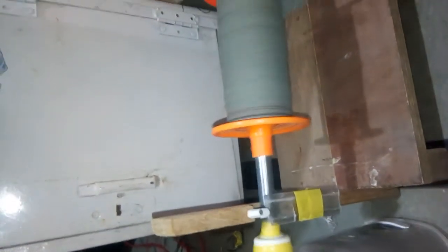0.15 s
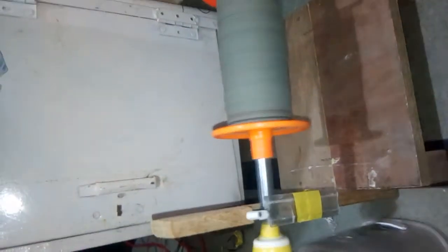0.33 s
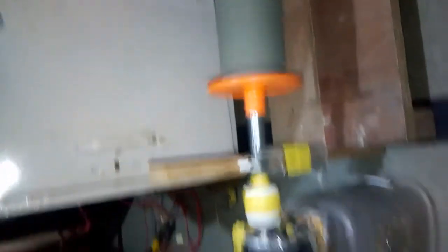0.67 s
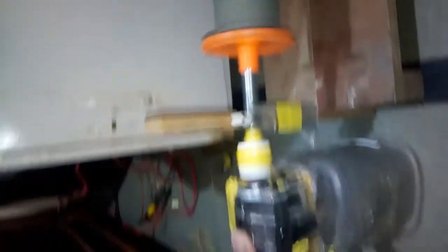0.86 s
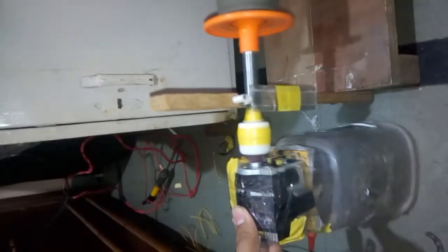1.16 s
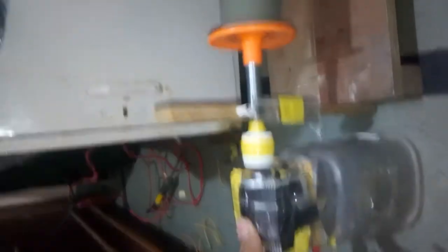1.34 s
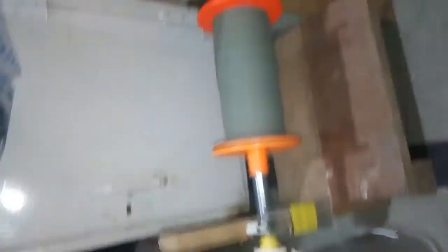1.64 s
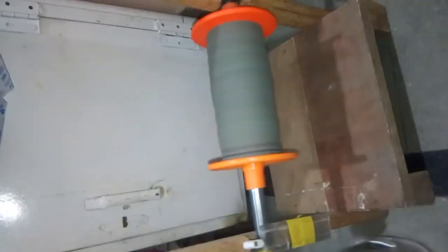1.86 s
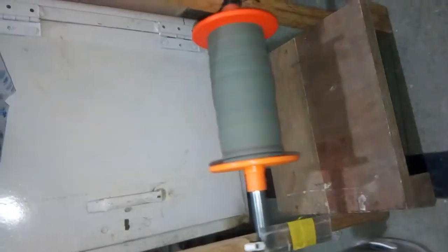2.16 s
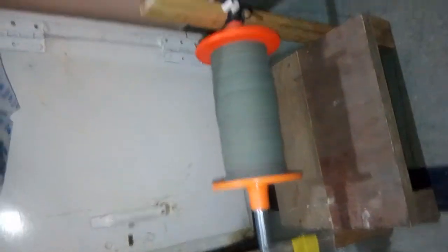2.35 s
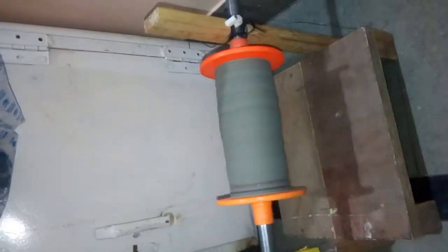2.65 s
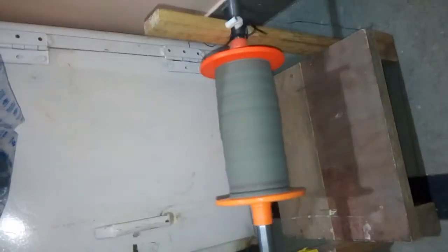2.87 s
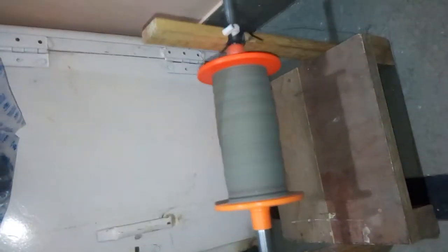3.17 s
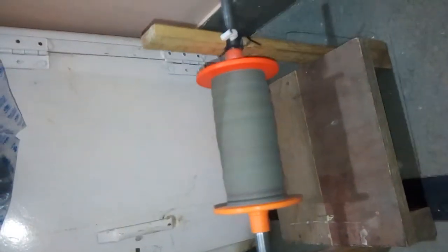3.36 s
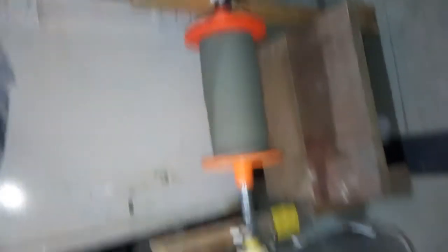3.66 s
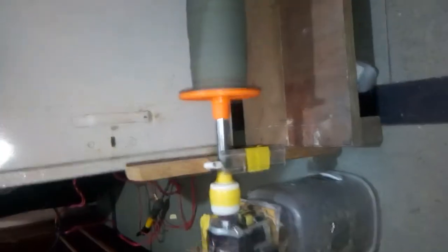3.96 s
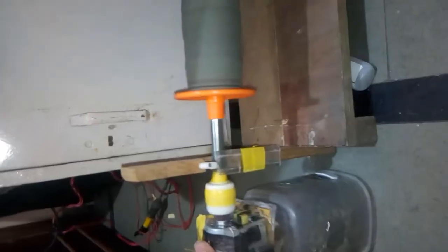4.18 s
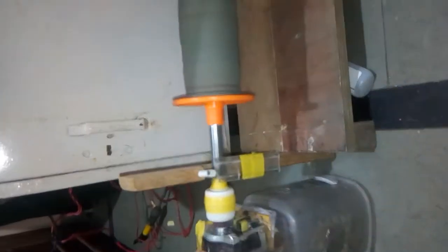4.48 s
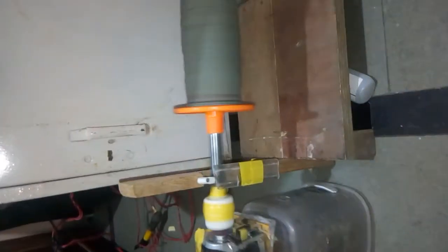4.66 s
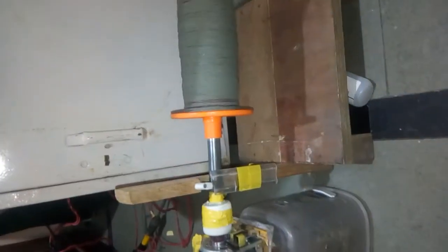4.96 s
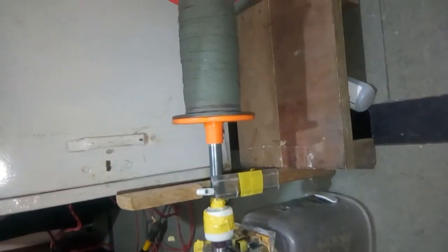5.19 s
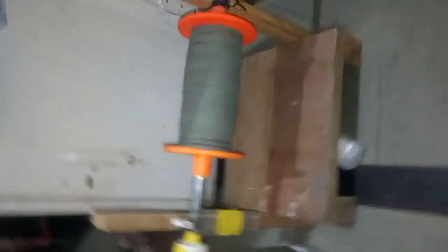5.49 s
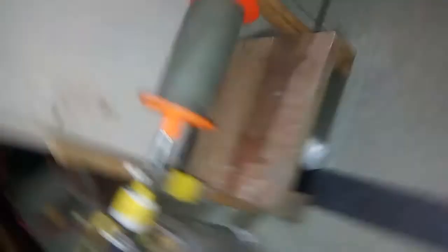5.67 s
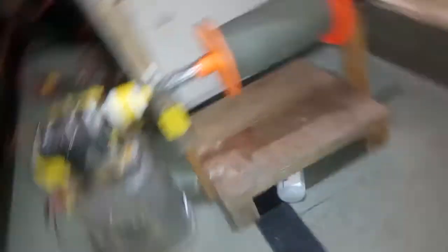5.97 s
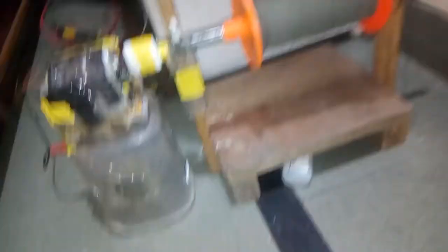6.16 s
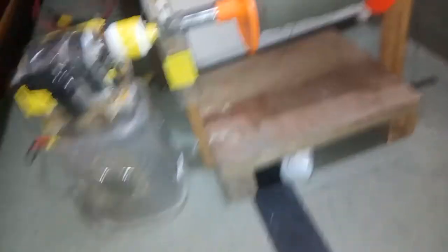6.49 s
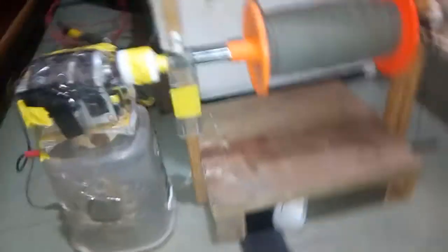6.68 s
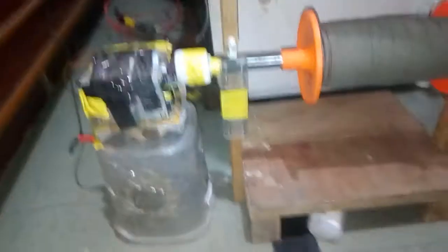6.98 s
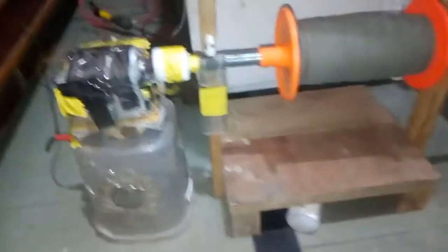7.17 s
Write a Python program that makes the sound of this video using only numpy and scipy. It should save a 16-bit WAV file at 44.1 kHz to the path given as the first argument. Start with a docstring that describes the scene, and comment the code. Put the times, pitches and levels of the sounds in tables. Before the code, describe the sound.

A motor-driven reel speeds up into a loud, buzzing rattle of metal clacks, wooden knocks and rasping friction, heard close up in a small room. The clatter slows for a moment, returns to full speed and winds down after about five seconds. Over a faint steady electrical hum, clothing then rustles quietly, followed by a brief high squeak and one soft bump on the microphone.

```python
"""A motor-driven reel on a loose shaft

A small DC motor spins a reel of thread in a wooden stand, close by in a small room. Once a turn the
steel shaft clacks in its bearing and the impact excites the modes of the stand. The motor sags, picks
up and coasts to a stop. A steady hum remains, with the friction of clothes, a short stick-slip squeak,
a tap on the microphone and two faint tones."""
import sys
import numpy as np
from scipy import signal
from scipy.fft import rfft, irfft, next_fast_len
from scipy.io import wavfile
from scipy.ndimage import map_coordinates

SR = 44100
rng = np.random.default_rng(int(sys.argv[2]) if len(sys.argv) > 2 else 0)


def unload_audio(sound):
    """Save the sound as a 16-bit wav file, at the path given as the first command line argument."""
    columns = np.transpose(np.atleast_2d(sound))
    # keep every value between -1 and 1, then stretch to whole-number steps
    steps = np.round(np.clip(columns, -1, 1) * 32767)
    wavfile.write(sys.argv[1], SR, steps.astype(np.int16))


N = 323253
POWER_OFF_S = 4.537  # the current is cut and the reel coasts

# Spectrum of steel striking steel. Each row: frequency in Hz, relative density in dB.
STEEL_SPECTRUM = [(300, -19), (1000, -5.5), (1700, -13.5), (2500, -3.5), (3300, -7), (4000, -5.5),
                  (4600, 3.5), (5100, -1), (5900, -2.5), (6600, -6.5), (7800, -28.5), (12000, -56.5),
                  (14000, -43), (15500, -32.5)]
# Modes of the motor housing. Each row: frequency in Hz, bandwidth in Hz, relative gain in dB.
HOUSING_MODES = [(1756, 46, -8), (1821, 71, -2), (1952, 54, 1), (1965, 30, 2), (2060, 90, -2),
                 (2154, 80, -7), (2362, 140, -6.5), (2467, 90, -9), (2630, 260, -16)]
# How loud and bright the steel clacks and rasp sound as the microphone moves.
# Each row: time in seconds, relative level in dB.
STEEL_LEVEL = [(0, -0.5), (.45, 0), (.75, 1.85), (1.05, -0.8), (1.9, 0.9), (2.15, 1.5), (2.45, -1.5),
               (3.05, 2), (3.9, .5), (4.42, 1.5), (4.65, -.5)]


def rattle():
    """Backlash: once a turn the loose shaft strikes its bearing, jolts the mounts and falls back."""
    # Impact laws of shaft, stand, bracket and housing. Each holds: relative level in dB, speed of
    # half strength in turns per second, steepness, drift in dB per second.
    shaft_law = (-25.3, 10.5, 2, 0.15)
    stand_law = (-19.5, 16.5, 4.0, 0.56)
    bracket_law = (-22.0, 20.0, 3.4, -0.65)
    housing_law = (-24.0, 19, 4, 0.64)
    speed, turns = reel()
    hits = np.flatnonzero(np.diff(np.floor(turns)))
    times, period, hit_speed = hits / SR, np.gradient(hits) / SR, speed[hits]
    clack, knock, clatter, clang = [impact_strength(law, hit_speed, times) * np.sqrt(period * SR)
                                    for law in (shaft_law, stand_law, bracket_law, housing_law)]
    fallback = times + period * (.61 + scatter(.03, times))
    return (shaft_impacts(times, period, fallback, clack, clang)
            + mount_knocks(times, hit_speed, fallback, knock, clatter, clang))


def shaft_impacts(times, period, fallback, clack, clang):
    """Hard impact: brief steel contacts give broadband clacks and excite the shaft's high modes."""
    # Modes of the shaft. Each row: frequency in Hz, bandwidth in Hz, relative gain in dB.
    shaft_modes = [(4286, 90, -1), (4480, 80, -1.5), (4867, 75, 1.5), (5290, 100, -4), (5677, 130, 0.5)]
    # Spectrum of a light contact. Each row: frequency in Hz, relative density in dB.
    tick_spectrum = [(400, -30), (2000, -13.5), (3500, -7.5), (4700, 2.5), (6200, 0), (7800, -20),
                     (12000, -28), (15500, -18.5)]
    # The hardest clacks. Each row: time in seconds, hardness (0 is usual; each layer scales it to dB).
    hard_clacks = [(.125, 2), (.183, 3.5), (2.098, 4.5), (2.179, 3.5), (2.222, 4), (3.1, 3.5), (4.44, 3)]
    steel_db = np.interp(times, *np.transpose(STEEL_LEVEL))
    coast_db = -38 * np.maximum(times - POWER_OFF_S, 0)  # the undriven shaft strikes more softly
    clack = clack * amp(steel_db + coast_db)
    hardness = scatter(1, times)
    for time, value in hard_clacks:
        hardness[np.argmin(np.abs(times - time))] = value
    steel, tick = minimum_phase(STEEL_SPECTRUM), minimum_phase(tick_spectrum)
    ring = struck(shaft_modes, centre_hz=4990, width_hz=2300)
    housing = struck(HOUSING_MODES, centre_hz=2215, width_hz=2670)
    # a gritty clack, a short ring, a bright crack and a nudge to the housing
    touch = times - .0008
    ring_db = hardness - 6.5 + scatter(2.5, times)
    crack_db = 1.3 * hardness + 1.5 * steel_db - 15.5
    sound = blows(touch, clack * amp(.6 * hardness - 2.5), steel, rise_s=.0018, decay_s=.0037, grit=.46)
    sound += blows(touch, clack * amp(ring_db), ring, rise_s=.00075, decay_s=.0029, grit=.3)
    sound += blows(touch, clack * amp(crack_db), tick, rise_s=.0007, decay_s=.0017, grit=.26)
    sound += blows(touch, clang * amp(-11), housing, rise_s=.0012, decay_s=.0025, grit=.3)
    # later in the turn the shaft scrapes along the bearing, then drops back with a light tick
    graze = times + period * (.31 + scatter(.13, times))
    graze_db = -14 + scatter(2.2, times)
    drop_db = -20.5 + np.clip(scatter(4.5, times), -9, 4.5)
    sound += blows(graze, clack * amp(graze_db), steel, rise_s=.00083, decay_s=.004, grit=.6)
    return sound + blows(fallback, clack * amp(drop_db), tick, rise_s=.00046, decay_s=.0024, grit=.301)


def mount_knocks(times, speed, fallback, knock, clatter, clang):
    """Modal ringing: each jolt sets the wooden stand, bearing bracket and motor housing vibrating."""
    # Modes of stand and bracket. Each row: frequency in Hz, bandwidth in Hz, relative gain in dB.
    stand_modes = [(590.4, 10, -7), (615, 15, -1.5), (674.3, 31, 2), (727.3, 38.5, 0.5), (796, 11, -13),
                   (932, 6.2, -4)]
    bracket_modes = [(1080, 62, -7.5), (1165, 50, -2), (1230.6, 60, 5.5), (1300, 50, -1.5),
                     (1387, 52, -9.5)]
    # The hardest jolts. Each row: time in seconds, stand and bracket levels in dB above the usual.
    hard_jolts = [(.285, 5, 0), (.441, 1.5, 2), (.62, 1.5, -1), (.688, 0, 4.5), (1.128, 2.5, 0.5),
                  (1.259, 2.5, 1), (1.485, 3, 2), (1.823, 4.5, 0), (2.276, 3.5, 2.5), (2.793, 1.5, 0),
                  (2.86, 2, 3), (2.909, 1, -2.5), (3.489, 2, 1), (4.084, 2.5, -0.5), (4.235, 1.5, 0.5),
                  (4.514, 5, 0.5), (4.546, 2.5, 1)]
    stand = struck(stand_modes, centre_hz=717, width_hz=253)
    bracket = struck(bracket_modes, centre_hz=1240, width_hz=1100)
    housing = struck(HOUSING_MODES, centre_hz=2215, width_hz=2670)
    knock, clatter, clang = mount_load(speed, times) * np.array([knock, clatter, clang])
    jolts = times + .0008 + .00023 * speed + scatter(.0008, times)  # the lag grows with speed
    stand_db, bracket_db, housing_db = scatter(1.1, times), scatter(1.5, times), scatter(1.57, times)
    for time, knock_db, clatter_db in hard_jolts:
        turn = np.argmin(np.abs(jolts - time))
        jolts[turn], stand_db[turn], bracket_db[turn] = time, knock_db, clatter_db
    sound = blows(jolts, knock * amp(stand_db - 1.5), stand, rise_s=.00046, decay_s=.0033, grit=.3)
    sound += blows(jolts, clatter * amp(bracket_db - 1.95), bracket,
                   rise_s=.00033, decay_s=.0069, grit=.42)
    sound += blows(jolts, clang * amp(housing_db - 2), housing, rise_s=.00013, decay_s=.0072, grit=.2)
    # only a fast reel lands hard enough to knock the stand again
    landings = fallback + scatter(.0033, times)
    second_knock = knock * (speed / speed.max()) ** 2 * amp(-7 + scatter(2, times))
    return sound + blows(landings, second_knock, stand, rise_s=.001, decay_s=.0026, grit=.35)


def reel():
    """Rotation: speed integrates to turns, and the shaft strikes at each whole number."""
    # Speed of the reel. Each row: time in seconds, turns per second.
    reel_speed = [(0, 8.34), (.27, 23.97), (.463, 27.45), (.698, 29.69), (.864, 29.47), (1.476, 31.27),
                  (1.701, 29.28), (2.072, 27.4), (2.285, 18.87), (2.642, 13.16), (2.661, 19.57),
                  (2.847, 26.8), (3.058, 30.96), (3.458, 33.05), (4.13, 33.43), (4.478, 31.88),
                  (4.666, 15.47), (5.024, 0)]
    speed = curve(reel_speed)
    return speed, .5 + np.cumsum(speed) / SR


def impact_strength(law, speed, times):
    """Saturation: blows grow steeply with speed until the shaft uses all its play."""
    db, half_speed, steepness, drift = law
    return amp(db + drift * times) / (1 + (half_speed / speed) ** steepness)


def mount_load(speed, times, pull_db=2, stiff_db=12, loosen_s=.18):
    """Reaction torque: the mounts are hit harder as the motor pulls; they start stiff and loosen."""
    pull = np.tanh(np.gradient(speed, times) / 30)  # saturates beyond 30 turns per second squared
    return amp(pull_db * pull - stiff_db * np.exp(-times / loosen_s))


def motor():
    """Sliding friction: brushes and bearings rasp with speed, and each turn shakes the base."""
    # Spectra of the rasp and of the base's rumble. Each row: frequency in Hz, relative density in dB.
    brush_spectrum = [(400, -22.5), (700, 8.5), (950, 5), (1550, -1.5), (1950, 2.5), (2500, -1.5),
                      (3400, -1.5), (4700, 0.5), (5900, -2.5), (6700, -15), (8000, -43), (12000, -40.5),
                      (14000, -38.5), (15500, -24)]
    base_spectrum = [(25, -19.5), (45, -18), (65, -5), (100, -0.5), (200, 3.5), (360, 3), (450, -10.5),
                     (700, -19), (1500, -56)]
    # Rumble just after a clack. Each row: time in seconds, level in dB.
    rumble_levels = [(0, -40), (.45, -31), (1.3, -36), (2.25, -35.5), (2.62, -30.5), (3.0, -39),
                     (4.05, -36.5), (4.4, -32), (4.75, -33), (5, -43)]
    speed, turns = reel()
    sparking = .15 * np.clip((POWER_OFF_S - np.arange(N) / SR) / .05, 0, 1)  # while current flows
    drag = (speed / speed.max()) ** 1.22
    rasp = amp(-34 + curve(STEEL_LEVEL) + 5.67 * wobble(180)) * (drag + sparking) * noise(brush_spectrum)
    since_clack_s = turns % 1 / (speed + 1e-6)
    rumble_db = curve(rumble_levels) - 57 * since_clack_s + 1.5 * wobble(60)
    moving = np.clip(speed / 6, 0, 1) * np.minimum(turns, 1) ** 3
    return rasp + amp(rumble_db) * moving * noise(base_spectrum)


def squeak(pitch_hz=2746):
    """Stick-slip oscillation: a dry contact gives one thin note, whose octave swells a moment later."""
    slopes = dict(rise_db_per_s=520, fall_db_per_s=600)
    onset = swell(start_s=6.412, hold_s=.058, db=-39, **slopes)
    overtone = swell(start_s=6.44, hold_s=.043, db=-43, **slopes)
    slip = swell(start_s=6.42, hold_s=.16, db=-63, **slopes)
    phase = 2 * np.pi * np.cumsum(pitch_hz + 5 * wobble(110)) / SR
    fundamental = (onset + slip) * amp(.8 * wobble(70)) * np.sin(phase)
    octave = (overtone + slip) * amp(4 * wobble(70)) * np.sin(2 * phase)
    return np.sqrt(2) * (fundamental + octave)


def microphone_tap(time_s=6.6466, width_s=.00033):
    """A pressure pulse: one soft push, high-passed because a microphone passes no steady pressure."""
    push = np.exp(-((np.arange(N) / SR - time_s) / width_s) ** 2)
    return amp(-13.5) * signal.sosfilt(signal.butter(1, 150, "highpass", fs=SR, output="sos"), push)


def clothes():
    """Friction noise: cloth rustles in strokes, with a faint fidget between them."""
    # Spectrum of rubbing cloth. Each row: frequency in Hz, relative density in dB.
    cloth_spectrum = [(260, -50), (450, -20), (616, -8.5), (922, -18), (1090, -9.5), (1440, -10.5),
                      (1700, -7.5), (2510, -4.5), (5540, 2), (6430, -4), (8290, -37), (16000, -32.5)]
    # Strokes of the cloth. Each row: start in seconds, length in seconds, level in dB.
    rustles = [(5.11, .08, -62), (5.492, .15, -49.5), (5.661, .33, -50.5), (6.142, .04, -56),
               (6.312, .02, -56), (6.417, .1, -56.5), (6.578, .08, -49.5), (6.86, .02, -55)]
    strokes = [swell(*row, rise_db_per_s=109, fall_db_per_s=190) for row in rustles]
    fidget = amp(-63 + 2 * wobble(14))
    return np.max(strokes + [fidget], axis=0) * amp(1.64 * wobble(45)) * noise(cloth_spectrum)


def settling_ticks():
    """Light impacts: the steel of the rig ticks as it settles."""
    # Ticks of the rig. Each row: time in seconds, level in dB averaged over 20 ms.
    ticks = [(5.172, -53.5), (6.575, -49.5), (6.625, -47.5), (6.655, -48), (7.265, -58)]
    times, db = np.transpose(ticks)
    sizes = amp(db) * np.sqrt(.02 * SR)
    return blows(times, sizes, minimum_phase(STEEL_SPECTRUM), rise_s=.0018, decay_s=.0078, grit=.65)


def faint_tones():
    """Pure tones: two brief sinusoids swell and fade far in the background."""
    # The tones. Each row: start in seconds, length in seconds, frequency in Hz, level in dB.
    tones = [(5.0, 0.056, 420, -63), (7.25, .04, 557, -64)]
    t = np.arange(N) / SR
    return sum(swell(start, length, db, rise_db_per_s=400, fall_db_per_s=400)
               * np.sqrt(2) * np.sin(2 * np.pi * hz * t) for start, length, hz, db in tones)


def hum_and_air():
    """A line spectrum over a continuous one: steady electrical hum and faint room air."""
    # Partials of the hum. Each row: frequency in Hz, level in dB.
    partials = [(124.7, -45), (250, -62), (74.5, -66.5)]
    # Spectrum of the room air. Each row: frequency in Hz, relative density in dB.
    air_spectrum = [(20, 5.5), (40, -3.5), (75, -10), (130, 2), (250, -6.5), (450, -16), (900, -25.5),
                    (2000, -43.5), (5000, -24), (6500, -32.5), (8200, -46.5), (16000, -47.5)]
    t = np.arange(N) / SR
    hum = sum(np.sqrt(2) * amp(db + .15 * wobble(4)) * np.sin(2 * np.pi * hz * t) for hz, db in partials)
    return hum + amp(-58.5) * noise(air_spectrum)


def room(x, positions=18):
    """Reverberation: each frequency dies at its own rate; the echoes shift as the microphone moves."""
    # Reverberation times. Each row: frequency in Hz, seconds to fall by 60 dB.
    decay_times = [(150, 0.06), (700, 0.33), (3000, 0.17), (8000, 0.22), (16000, 0.05)]
    hz, t, spectra = signal.stft(rng.standard_normal((positions, SR // 3)), SR, nperseg=256)
    tails = signal.istft(spectra * amp(-60 * t / along(decay_times, hz)[:, None]), SR, nperseg=256)[1]
    place = np.linspace(0, positions - 1, N)
    delayed = np.pad(x, (SR // 200, 0))[:N]
    wet = np.zeros(N + SR)
    for k, tail in enumerate(tails):
        near = np.flatnonzero(np.abs(place - k) < 1)
        crossfade = np.cos(np.pi / 2 * (place[near] - k))
        echo = signal.fftconvolve(delayed[near] * crossfade, tail / np.linalg.norm(tail))
        wet[near[0]:][:len(echo)] += echo
    return wet[:N]


def blows(times, sizes, body, rise_s, decay_s, grit):
    """Source and filter: bursts of chattering contacts ring a body; size squared is a blow's energy."""
    t = np.arange(SR // 10) / SR
    shape = len(times), len(t)
    contacts = rng.standard_normal(shape)
    contacts *= np.exp(grit * np.repeat(rng.standard_normal(shape), 16, axis=1)[:, :len(t)])
    rings = filtered(contacts * (1 - np.exp(-t / rise_s)) ** 2 * np.exp(-t / decay_s), body)
    rings *= (sizes / np.linalg.norm(rings, axis=1))[:, None]
    samples = np.round(np.abs(times) * SR).astype(int)[:, None] + np.arange(len(t))
    return np.bincount(samples.ravel(), rings.ravel(), N)[:N]


def struck(modes, centre_hz, width_hz):
    """Modal superposition: resonances driven through a springy contact that passes one broad band."""
    def resonance(f, hz, width):
        return 1j * f * width / (hz * hz - f * f + 1j * f * width)
    return lambda f: (sum(amp(db) * resonance(f, hz, width) for hz, width, db in modes)
                      * resonance(f, centre_hz, width_hz) ** 2)


def minimum_phase(spectrum):
    """Causal response with the given spectrum, by folding the cepstrum."""
    def response(hz):
        cepstrum = irfft(np.log(amp(along(spectrum, hz))))
        half = len(cepstrum) // 2
        return np.exp(rfft(np.r_[cepstrum[0], 2 * cepstrum[1:half], np.zeros(half)]))
    return response


def filtered(x, response):
    """Convolution as a product of spectra."""
    n = x.shape[-1]
    padded = 2 * next_fast_len(n)
    return irfft(rfft(x, padded) * response(np.fft.rfftfreq(padded, 1 / SR)), padded)[..., :n]


def noise(spectrum):
    """Coloured noise of rms 1."""
    x = filtered(rng.standard_normal(N), lambda hz: amp(along(spectrum, hz)))
    return x / np.sqrt(np.mean(x ** 2))


def swell(start_s, hold_s, db, rise_db_per_s, fall_db_per_s):
    """Exponential envelope that reaches db at start_s, holds and falls."""
    t = np.arange(N) / SR - start_s
    return amp(db - rise_db_per_s * np.maximum(-t, 0) - fall_db_per_s * np.maximum(t - hold_s, 0))


def wobble(knots_per_s):
    """A smooth random curve."""
    knots = rng.standard_normal(int(N * knots_per_s / SR) + 4)
    return map_coordinates(knots, [np.arange(N) * knots_per_s / SR])


def scatter(deviation, times):
    """One Gaussian draw for each blow."""
    return deviation * rng.standard_normal(len(times))


def curve(points):
    """Linear interpolation in time, one value a sample."""
    return np.interp(np.arange(N) / SR, *np.transpose(points))


def along(points, hz):
    """Interpolation on a logarithmic frequency axis."""
    knot_hz, values = np.transpose(points)
    return np.interp(np.log(hz + 1), np.log(knot_hz + 1), values)


def amp(db):
    """Decibels to gain."""
    return 10 ** (np.asarray(db) / 20)


def scene():
    """Superposition: the rig, its reverberation, small close sounds and the background."""
    rig = rattle() + motor()
    close_sounds = squeak() + microphone_tap() + clothes() + settling_ticks()
    return (rig + amp(-11.5) * room(rig) + close_sounds + faint_tones() + hum_and_air())[None]


def record(dry, top_hz=16000):
    """Band limiting: an ideal low-pass filter removes the highest treble."""
    return filtered(dry, lambda hz: hz < top_hz)


dry = scene()
out = record(dry)
unload_audio(out)
```